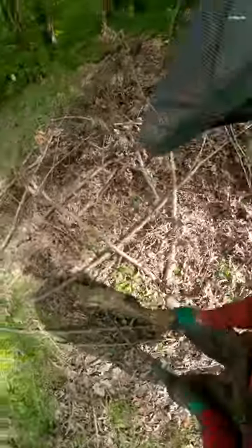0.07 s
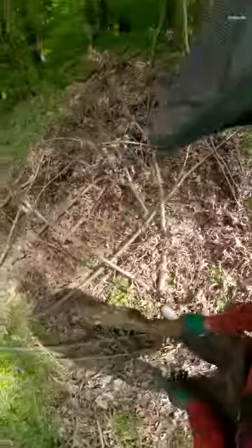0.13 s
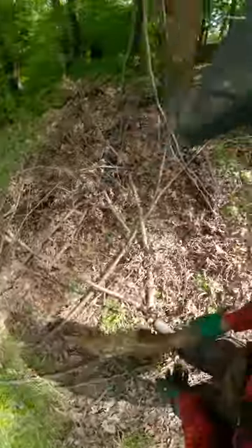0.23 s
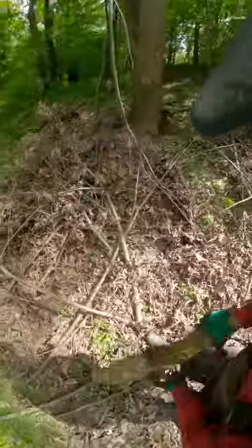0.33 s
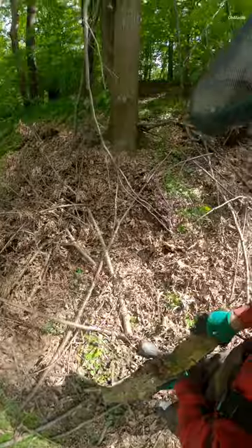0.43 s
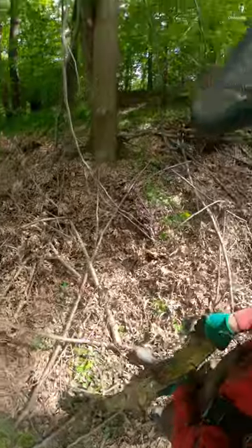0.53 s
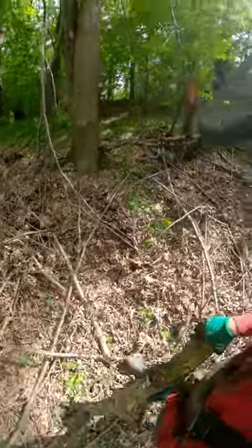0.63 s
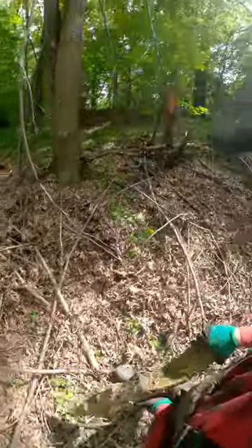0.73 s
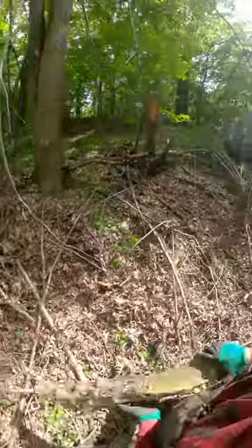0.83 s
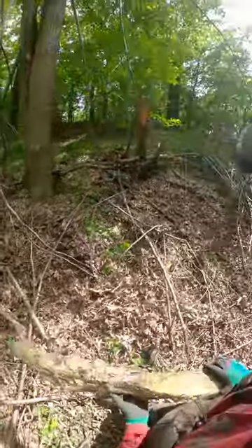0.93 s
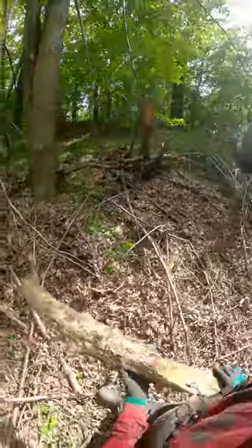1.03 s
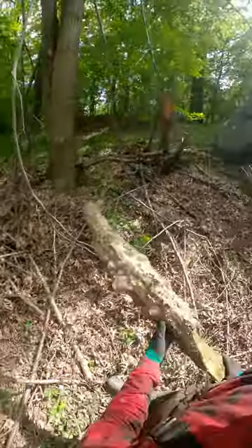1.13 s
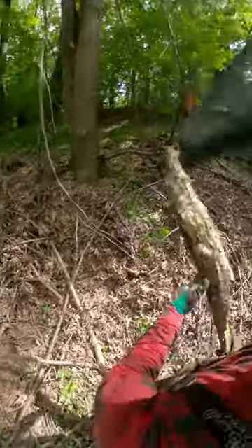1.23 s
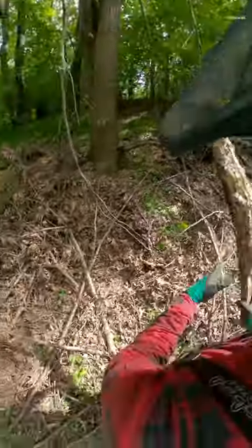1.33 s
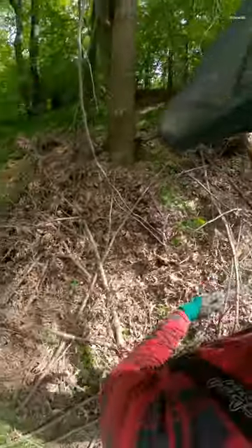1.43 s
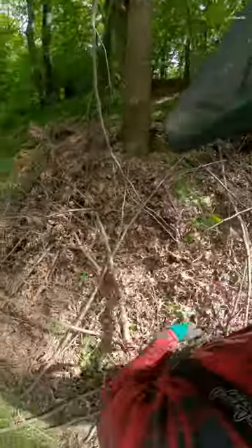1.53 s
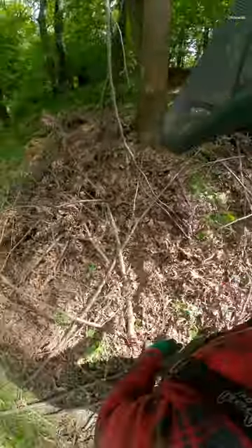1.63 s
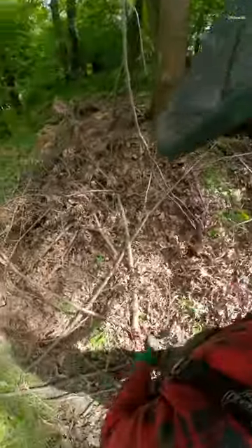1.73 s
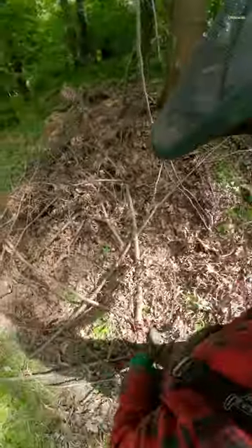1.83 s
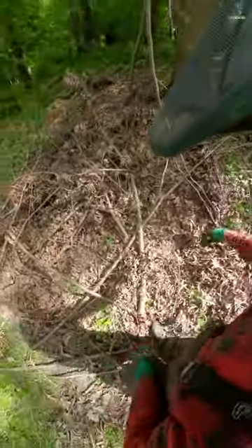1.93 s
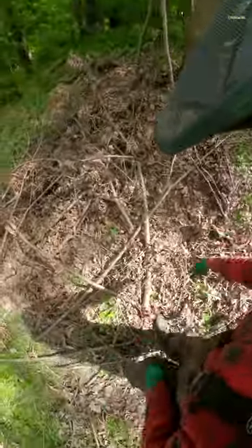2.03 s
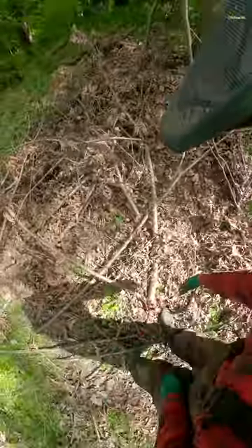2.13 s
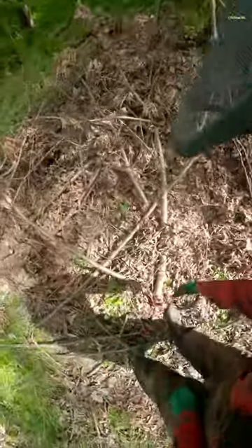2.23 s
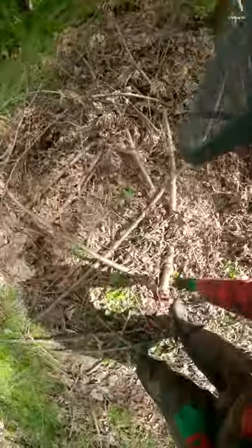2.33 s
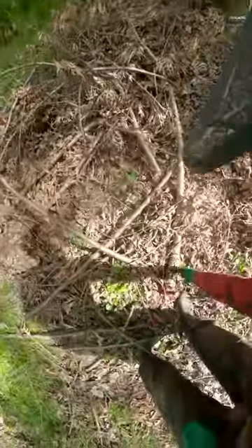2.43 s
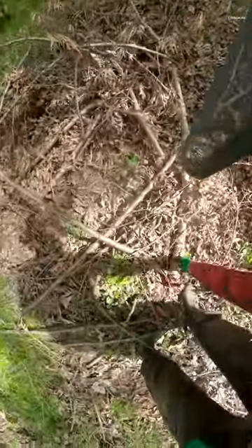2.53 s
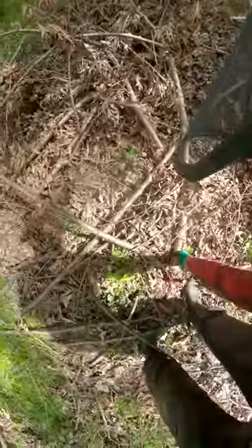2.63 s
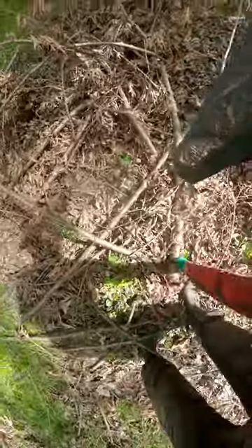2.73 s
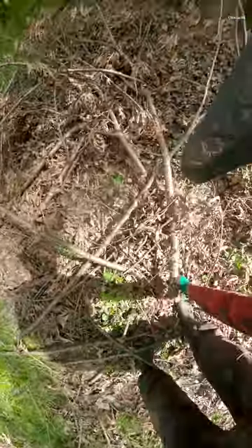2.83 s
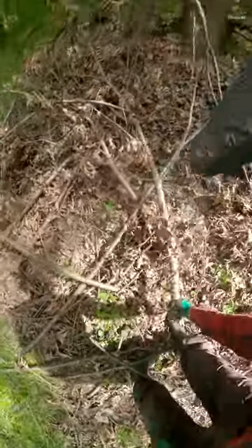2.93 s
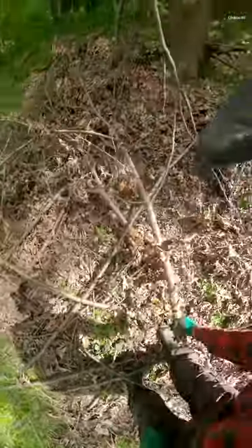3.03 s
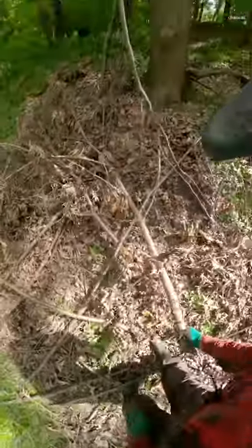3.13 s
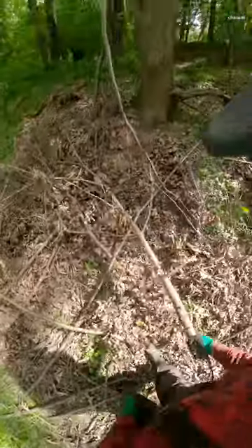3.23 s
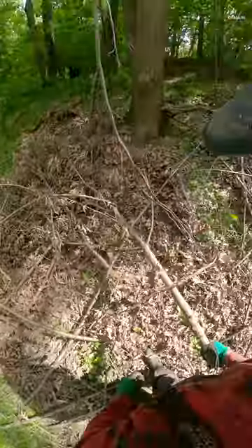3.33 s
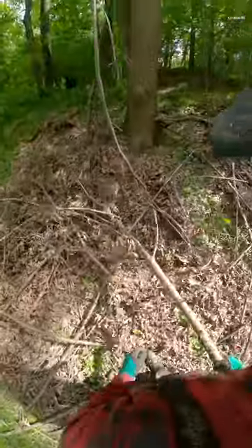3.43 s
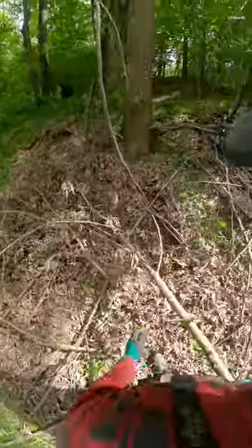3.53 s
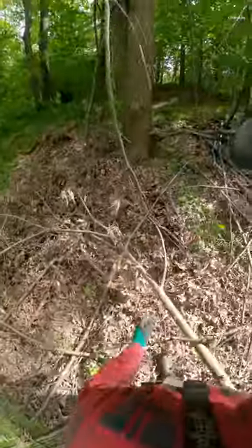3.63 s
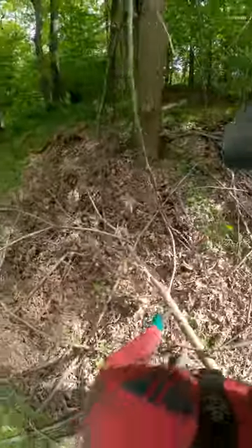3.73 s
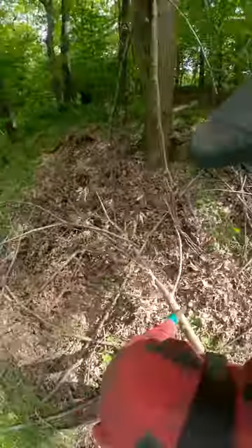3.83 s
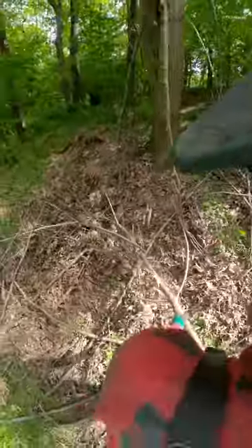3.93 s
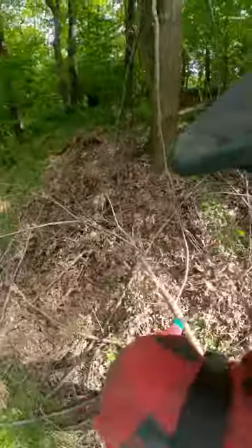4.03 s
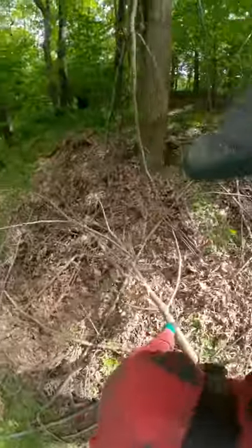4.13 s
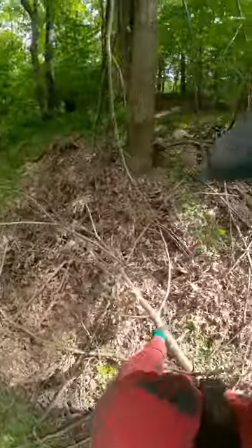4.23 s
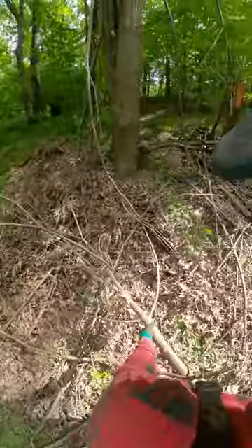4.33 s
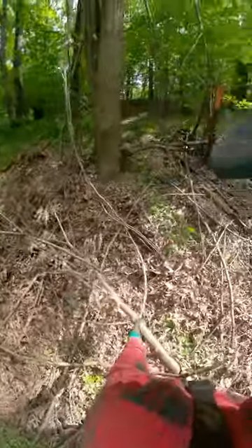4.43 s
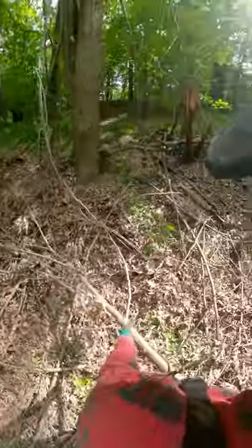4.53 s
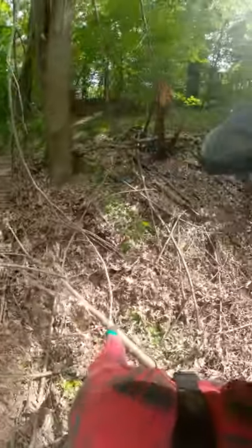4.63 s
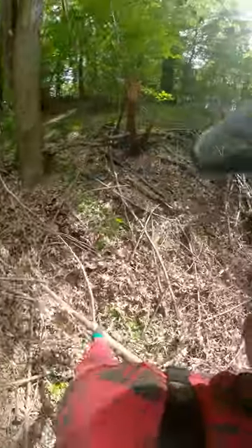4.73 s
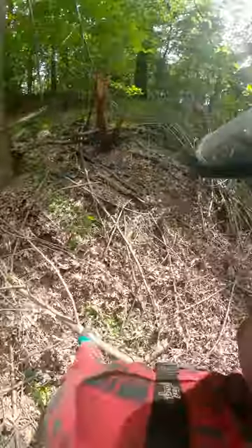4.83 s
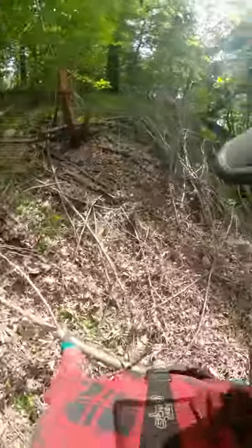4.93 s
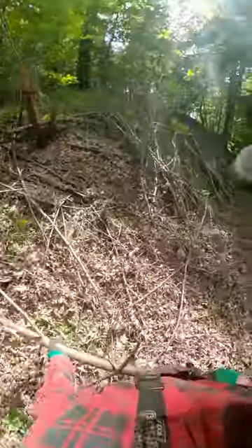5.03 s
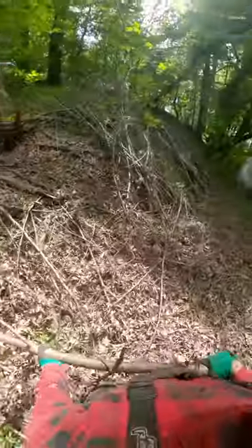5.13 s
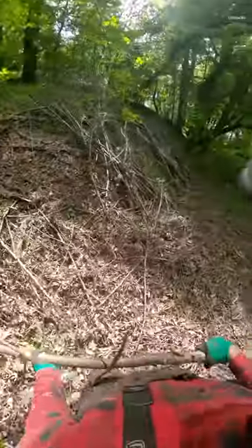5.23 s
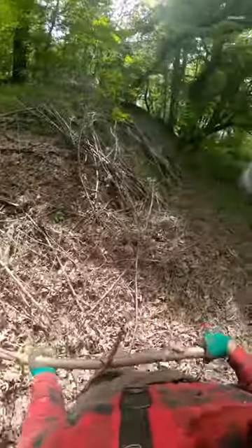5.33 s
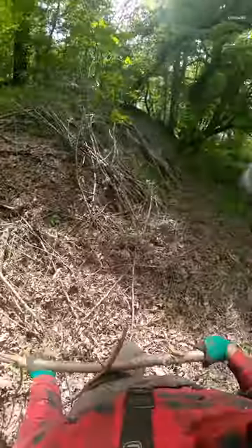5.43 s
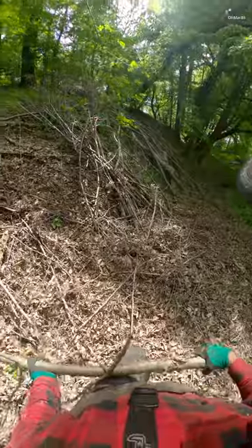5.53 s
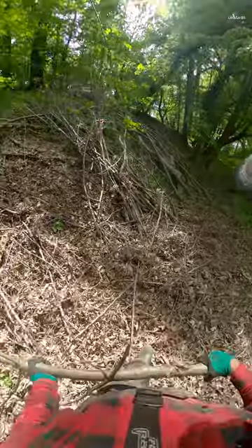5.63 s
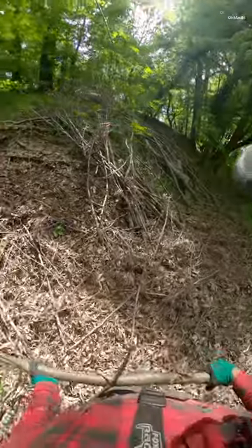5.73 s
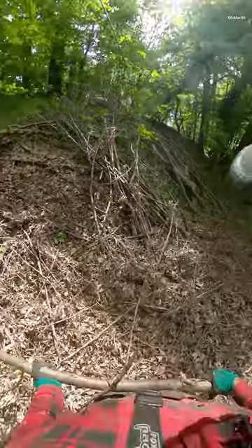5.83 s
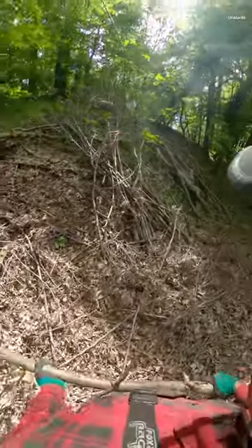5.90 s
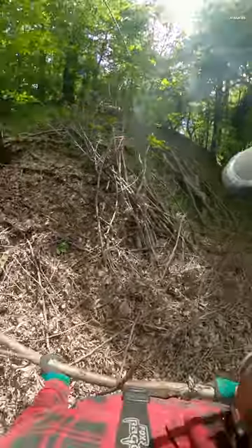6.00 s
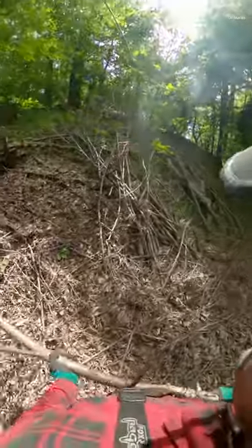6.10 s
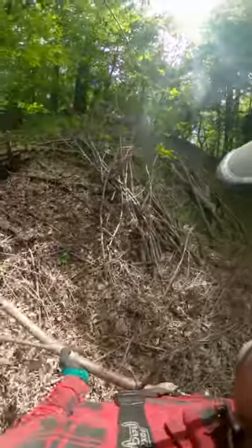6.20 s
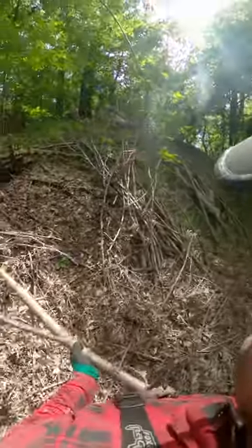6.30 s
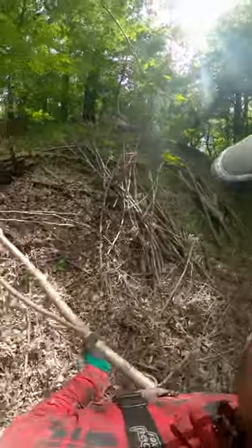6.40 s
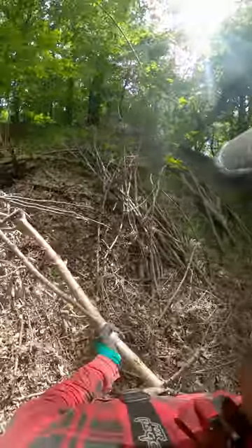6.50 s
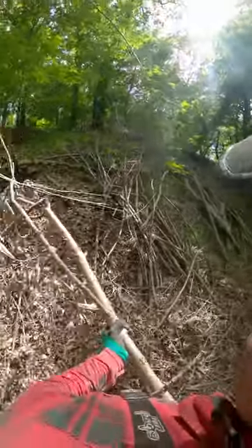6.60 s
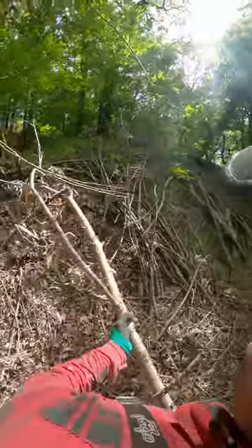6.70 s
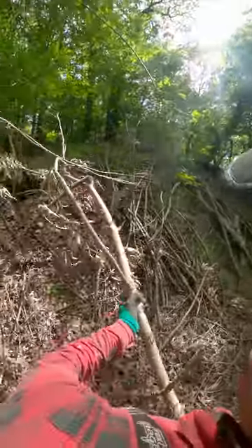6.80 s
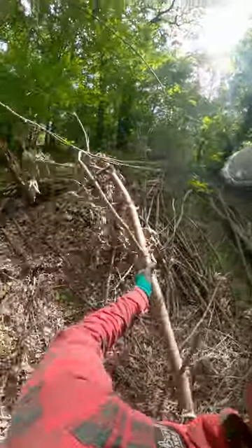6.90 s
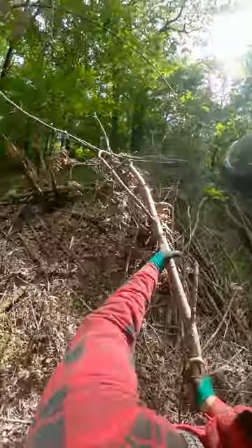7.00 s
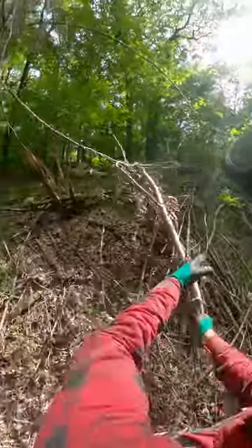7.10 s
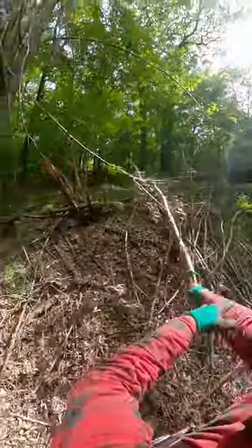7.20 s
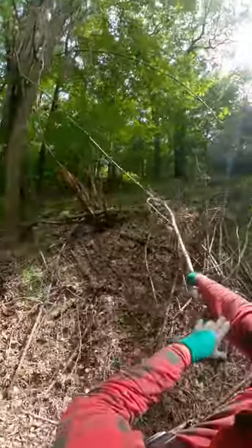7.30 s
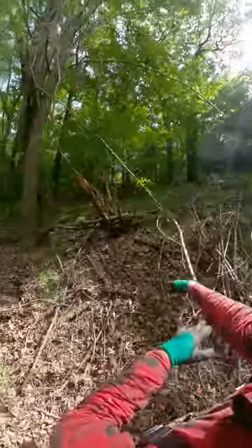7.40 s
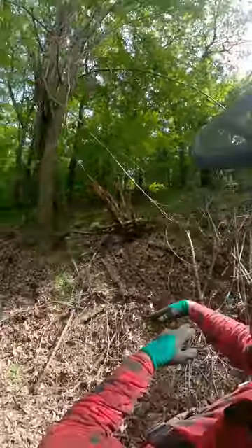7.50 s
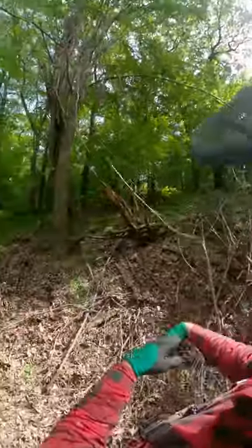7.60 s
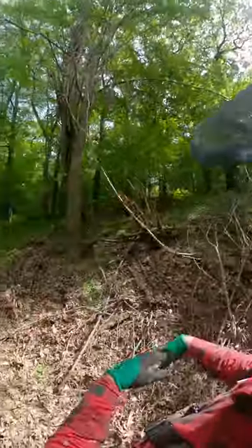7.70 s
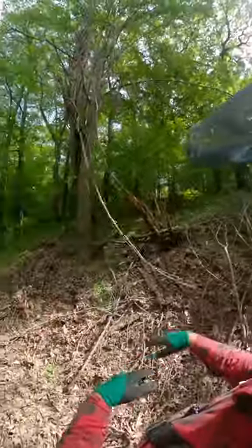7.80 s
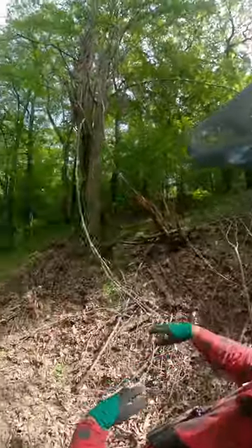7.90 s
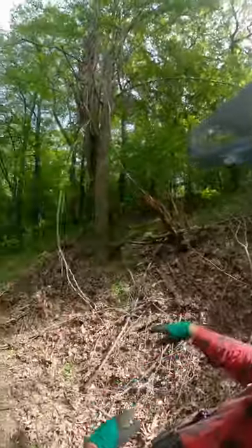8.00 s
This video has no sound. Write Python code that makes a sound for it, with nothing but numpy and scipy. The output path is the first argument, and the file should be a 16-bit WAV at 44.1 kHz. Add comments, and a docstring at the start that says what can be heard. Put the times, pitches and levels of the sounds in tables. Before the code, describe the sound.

Someone hauls wood through crisp leaf litter: rushing rustles, a dull log thud, sharp twig cracks, then a hollow clatter of a thrown branch.

```python
"""Dry leaves crackle at once under sweeping cut branches, while air buffets a body-worn microphone.
The scene is a wooded bank: boots crush the litter, twigs snap, a log thuds down and later a branch clatters in.
Leaves, stems and litter are crowds of tiny random clicks, each filtered to its own tone.
Snaps are short noise bursts, wood knocks are sums of dying tones, and wind and the woods are filtered noise."""
import sys
import numpy as np
from scipy import signal
from scipy.fft import rfft, irfft, next_fast_len
from scipy.io import wavfile

SR = 44100
rng = np.random.default_rng(int(sys.argv[2]) if len(sys.argv) > 2 else 0)


def dump_mix(stems):
    """Bounce the given channels to the path in sys.argv[1] as a 16-bit WAV at rate SR."""
    frames = np.atleast_2d(stems).T  # one column per channel
    limited = np.clip(frames, -1, 1)  # hard clip at full scale
    pcm = np.round(limited * 32767).astype(np.int16)
    wavfile.write(sys.argv[1], SR, pcm)


N = 355225
TIME = np.arange(N) / SR  # seconds

# How widely ground sounds and the woods spread. Each row: pitch in Hz, side minus middle in dB.
WIDTH = [(100, -15), (600, -20.5), (1400, -13.5), (3100, -14), (4500, -9), (7000, -10), (10000, -5.5),
         (14000, -16)]
# Weight on the ground; a raised branch only brushes the leaf tops, sparing stems and litter.
# Each row: time in seconds, change in level in dB.
WEIGHT = [(0, 2.5), (1.3, -0.5), (2.4, 5), (2.8, -2.5), (3.1, 2.5), (3.8, -2), (4.1, -3.5), (4.7, -5),
          (5.2, 1), (6.8, -0.5), (7.4, 2.5), (7.85, 3), (7.92, -3.5)]
# The tones of a thin branch. Each row: pitch in Hz, level in dB, time to fall by 60 dB in seconds.
BRANCH = [(1100, -4, 0.012), (1280, 7.5, 0.0097), (1520, 5.5, 0.011), (1695, 4, 0.014), (2020, -2, 0.013),
          (2090, 2.5, 0.021), (2510, 9.5, 0.0086), (3020, 2, 0.013), (3570, 7, 0.02)]


def from_db(db):
    """Turn decibels into a gain."""
    return 10 ** (np.asarray(db) / 20)


def rms_one(x):
    """Scale a sound to an average power of one."""
    return x / np.sqrt(np.mean(x ** 2) + 1e-20)


def in_time(rows):
    """Draw straight lines between (seconds, value) rows to get a value at every sample."""
    return np.interp(TIME, *np.transpose(rows))


def at_hz(points, hz):
    """Read a (Hz, value) curve on a log-frequency axis, as the ear spaces pitch."""
    curve_hz, values = np.transpose(points)
    return np.interp(np.log(np.maximum(hz, 1)), np.log(curve_hz), values)


def drift(rate_hz):
    """Slow random wandering with spread 1, made at every 20th sample and joined by lines."""
    step, warm_up = 20, 2000
    pole = np.exp(-2 * np.pi * rate_hz * step / SR)
    noise = rng.standard_normal(N // step + warm_up + 2)
    slow = signal.lfilter([1], [1, -2 * pole, pole * pole], noise)[warm_up:]
    return np.interp(np.arange(N) / step, np.arange(len(slow)), rms_one(slow))


def coloured(x, spectrum, size=8192):
    """Filter to a spectrum with no sound ahead of its cause (minimum phase)."""
    wanted_gain = from_db(at_hz(spectrum, np.fft.rfftfreq(size, 1 / SR)))
    cepstrum = irfft(np.log(wanted_gain))
    # folding the second half onto the first puts the filter's energy as early as possible
    cepstrum[1:size // 2] *= 2
    cepstrum[size // 2 + 1:] = 0
    response = irfft(np.exp(rfft(cepstrum)))
    return signal.oaconvolve(x, response[None], axes=-1)[:, :N]


def add(out, s, sound):
    """Mix a sound in from time s in seconds."""
    start = int(s * SR)
    out[:, start:start + sound.shape[-1]] += sound[..., :N - start]


def left_right(pan_db):
    """Gains that set left minus right to pan_db."""
    return from_db(np.array([[pan_db], [-pan_db]]) / 2)


def in_stereo(mid_side, width):
    """Left and right share the middle sound and differ by a side sound of the given width."""
    side = coloured(mid_side[1:], width)
    return mid_side[:1] + side * [[1], [-1]]


def fractures(per_s, spread_db):
    """Random clicks of uneven size as (middle, side), their power kept steady as the rate changes."""
    chance = np.clip(per_s / SR * np.ones(N), 1e-5, 1)
    at = np.flatnonzero(rng.random(N) < chance)
    size_db = spread_db * np.minimum(rng.exponential(1, len(at)), 4)
    size = from_db(size_db) / np.sqrt(chance[at])  # crowded clicks are each smaller
    clicks = np.zeros((2, N))
    # independent signs in middle and side send clicks to different sides
    clicks[:, at] = size * np.sign(rng.random((2, len(at))) - .5)
    return rms_one(clicks)


def crackle(per_s, spread_db, clump_db, patchy_db, edges_hz):
    """Fractures ring briefly, per_s in each band, and clump together as leaves catch and let go."""
    out = 0
    for low, high in zip(edges_hz, edges_hz[1:]):
        band = signal.butter(2, [low, high], "band", fs=SR, output="sos")
        ringing = signal.sosfilt(band, fractures(per_s, spread_db) + 1e-18)
        out = out + ringing * from_db(patchy_db * drift(21))
    return out * from_db(clump_db * drift(56))


def pull():
    """How hard wood is drawn over the ground, in dB above a firm pull."""
    # The log is pulled clear of the leaves and lifted. Each row: time in seconds, pull in dB.
    lift = [(0.0, -28.5), (0.248, -25.5), (0.662, -43.5), (0.7, -37.5), (1.526, -61.5), (1.564, -46),
            (1.758, -54.5), (1.824, -49), (1.95, -62)]
    # The branch is picked up, dragged along and thrown on the pile. Each row: time in seconds, pull in dB.
    drag = [(2.22, -47), (2.33, -40), (2.53, -44.5), (3.08, -22.5), (3.81, -22.5), (4.04, -32.5),
            (4.27, -33), (4.33, -32), (4.35, -29.5), (4.49, -28.5), (4.56, -34), (4.95, -24), (5.56, -34.5),
            (5.66, -28.5), (6.65, -28.5), (6.7, -24), (7.11, -26.5), (7.19, -32.5), (7.66, -25.5),
            (8.05, -43.5)]
    firm_pull_db = -26.5
    return in_time(np.vstack([lift, drag])) - firm_pull_db


def swell(s, rise_s, fall_s):
    """Pressure builds up to time s and then dies away."""
    before = np.minimum(TIME - s, 0)
    after = np.maximum(TIME - s, 0)
    return np.exp(-(before / rise_s) ** 2 - after / fall_s)


def with_treads(level_db, axis):
    """Boots and wood press into the ground, raising leaves (axis 0), stems (1) or litter (2)."""
    # Each row: time in seconds, dying time in seconds, then leaves, stems and litter in dB.
    treads = [(0.72, 0.07, -38, -58, -61), (1.61, 0.14, -59, -55, -66), (1.992, 0.078, -38.5, -46, -41.5),
              (2.071, 0.12, -27.5, -31.5, -37), (2.351, 0.036, -35.5, -34.5, -43),
              (2.62, 0.18, -51, -37.5, -52), (3.70, .06, -36, -29.5, -45),
              (3.785, 0.046, -31.5, -39, -37.5), (5.50, 0.059, -49, -43, -40.5),
              (5.675, 0.11, -25, -27, -35), (5.78, .04, -34, -35, -40), (6.02, 0.048, -28, -36, -40),
              (6.14, 0.047, -39, -47, -38), (6.41, 0.21, -31.5, -37, -38.5), (6.649, .02, -38, -39, -30),
              (7.13, 0.015, -34, -28, -35), (7.26, 0.033, -45.5, -42, -43), (7.62, 0.16, -35, -31.5, -38),
              (7.86, 0.014, -53, -36, -55)]
    rise_s = 0.029
    power = from_db(level_db) ** 2
    for s, fall_s, *layer_db in treads:
        power = power + (from_db(layer_db[axis]) * swell(s, rise_s, fall_s)) ** 2
    return 10 * np.log10(power)


def with_swings(level_db, swings):
    """Raise a level in dB by movements that speed up and slow down evenly."""
    power = from_db(level_db) ** 2
    for s, half_s, db in swings:
        power = power + from_db(db) ** 2 * np.exp(-2 * ((TIME - s) / half_s) ** 2)
    return 10 * np.log10(power)


def leaves():
    """A harder sweep breaks more leaves at once, so lone crackles merge into a rush."""
    # The tone of crackling leaves. Each row: pitch in Hz, strength in dB per Hz.
    leaf_tone = [(500, -33.5), (1200, -10), (2200, -4), (3000, -2), (4000, 0.5), (5200, -1.5), (6700, 0.5),
                 (7300, -3), (8100, -12), (9600, -15.5), (10600, -24.5), (11800, -30.5), (14500, -33.5),
                 (16000, -53)]
    # Twigs catch and spring free. Each row: time in seconds, half length in seconds, rustle in dB.
    swishes = [(1.063, 0.057, -43.5), (1.29, .03, -51.5), (1.396, .02, -50.5), (2.922, .04, -29),
               (4.43, 0.05, -33), (4.725, 0.045, -30), (5.37, 0.052, -30), (5.982, .03, -26),
               (6.277, 0.017, -29), (6.783, 0.016, -21), (6.889, 0.018, -24.5), (7.013, 0.026, -30)]
    firm_db, firm_per_s, crowding, spread_db = -26, 3600, .7, 2.3
    level_db = with_swings(with_treads(firm_db + pull(), axis=0), swishes)
    rate = firm_per_s * from_db(crowding * (level_db - firm_db))
    edges_hz = np.geomspace(700, 17000, 10)
    small = rms_one(crackle(rate, spread_db, clump_db=0.64, patchy_db=1.28, edges_hz=edges_hz))
    # brittle stalks break across all bands at once
    crisp = from_db(-12) * fractures(rate * 0.16, spread_db)
    return from_db(level_db) * rms_one(coloured(small + crisp, leaf_tone))


def stems():
    """Thin stems stick and slip on each other with hollow ticks."""
    # The tone of the ticks. Each row: pitch in Hz, strength in dB per Hz.
    stem_tone = [(400, -12.5), (900, -9), (1180, -2), (1700, -3.5), (2400, -5.5), (3500, -13),
                 (7000, -22.5), (12000, -66)]
    firm_db, gain_db = -35.5, -3  # level at a firm pull, ahead of weight and gain
    follows, bears = 0.66, .5  # shares of the pull's swing and of the weight that stems take up
    ticks = crackle(700, spread_db=0.0, clump_db=2.0, patchy_db=1.6, edges_hz=np.geomspace(600, 6000, 8))
    level_db = with_treads(firm_db + follows * pull() + bears * in_time(WEIGHT), axis=1)
    return from_db(level_db + gain_db) * rms_one(coloured(ticks, stem_tone))


def litter():
    """The packed layer under the leaves gives way with a dull crunch."""
    # The tone of the crunch. Each row: pitch in Hz, strength in dB per Hz.
    litter_tone = [(60, -27.5), (150, -1), (280, 0), (600, 0.5), (900, -1.5), (1400, -8.5), (3000, -38),
                   (9000, -56)]
    firm_db, gain_db = -44.5, 2.0  # level at a firm pull, ahead of weight and gain
    follows = 0.53  # share of the pull's swing
    crunch = crackle(550, spread_db=1.5, clump_db=0.5, patchy_db=2.4, edges_hz=np.geomspace(90, 2400, 6))
    level_db = with_treads(firm_db + follows * pull() + in_time(WEIGHT), axis=2)
    return from_db(level_db + gain_db) * rms_one(coloured(crunch, litter_tone))


def turned(x):
    """As the wearer turns, the microphone's body shades treble from the far side."""
    # Bearing of the rustle. Each row: time in seconds, left minus right in dB in the treble.
    bearing = [(0.0, 0.5), (1.03, 6.5), (1.75, 6), (1.97, 2.5), (2.17, 2.5), (2.38, 0), (2.85, -0.5),
               (3.2, 1), (4.35, 1.5), (4.64, 0.5), (5.36, 3.5), (6.28, 4.5), (7.2, 2), (7.67, 4.0),
               (8.05, 4)]
    # Long waves bend round the body. Each row: pitch in Hz, share of the level difference from 0 to 1.
    shadow = [(700, 0), (1300, 1), (3200, 1), (4600, 1), (8000, 0.6), (13000, 0.5)]
    size = next_fast_len(N)
    share = np.clip(at_hz(shadow, np.fft.rfftfreq(size, 1 / SR)), 0, 1)
    treble = irfft(rfft(x, size) * share, size)[:, :N]
    side_gain = from_db(in_time(bearing) * [[.5], [-.5]])
    return x + treble * (side_gain - 1)


def rustle():
    """Leaves, stems and litter sound from the ground on the left or from the pile ahead."""
    # Where the rustle comes from. Each row: time in seconds, share from the pile ahead from 0 to 1.
    ahead_share = [(0, 0.31), (1.9, 0.1), (2.0, 0.7), (2.6, 0.75), (2.9, 0.32), (3.8, 0.33), (4.3, 0.25),
                   (7.1, 0), (7.25, 0.14), (7.45, 0.84), (8.05, 0.94)]
    # The microphone's body colours each direction differently. Each row: pitch in Hz, level in dB.
    from_left = [(3500, -1), (4080, 2), (4450, -7.5), (4850, -3.5), (5500, 0), (8000, 0.5), (9500, -0.5)]
    from_ahead = [(3400, 1), (3850, -5), (4200, -6), (4600, 2.5), (5250, 0), (5750, -3), (6250, -1),
                  (7100, 1.5), (7500, 2.5), (8200, 8), (10000, 6)]
    ground = in_stereo(leaves() + stems() + litter(), WIDTH)
    ahead = np.clip(in_time(ahead_share), 0, 1)
    return turned((1 - ahead) * coloured(ground, from_left) + ahead * coloured(ground, from_ahead))


def wind():
    """Eddies burst on the two microphone ports; slow air sheds only the large, deep ones."""
    # Light air between gusts. Each row: time in seconds, buffet in dB ahead of the gain.
    breeze = [(0, -53), (4.9, -44.5), (6.2, -57.5), (8.05, -46.5)]
    # Each swing of the body pushes air over the ports.
    # Each row: time in seconds, half length in seconds, buffet in dB ahead of the gain.
    gusts = [(0.02, 0.057, -26.5), (0.18, 0.06, -36), (0.603, .03, -38), (1.14, 0.14, -29),
             (1.442, 0.079, -39), (1.566, 0.035, -30.5), (1.773, 0.027, -40), (2.107, 0.098, -38.5),
             (3.04, 0.07, -27.5), (3.253, 0.053, -34.5), (3.492, 0.033, -37), (3.792, .03, -19.5),
             (3.859, 0.044, -25), (4.02, 0.055, -33), (4.148, 0.049, -24), (4.38, 0.13, -42),
             (4.64, 0.19, -29), (4.85, 0.038, -30.5), (4.976, .03, -32.5), (5.106, .02, -34),
             (7.05, 0.024, -30), (7.167, 0.12, -28.5), (7.845, 0.039, -33)]
    # The tone of a gust. Each row: pitch in Hz, strength in dB per Hz.
    gust_tone = [(12, -19), (25, 0.5), (55, 3.5), (100, -1.5), (160, -10), (260, -18.5), (400, -35),
                 (1000, -46), (5000, -115)]
    # Small eddies strike each port alone. Each row: pitch in Hz, side minus middle in dB.
    wind_width = [(30, -3), (60, -2), (130, -1.5), (300, -3)]
    even_mix_db, lumpy_db, gain_db = -34, 2, -1.5  # gust and lull mix evenly at the first level
    level_db = with_swings(in_time(breeze), gusts)
    lumpy_noise = rng.standard_normal((2, N)) * from_db(lumpy_db * drift(19))
    gust = rms_one(coloured(lumpy_noise, gust_tone))
    lull = rms_one(signal.lfilter(*signal.butter(1, 70, fs=SR), gust))
    lull[1] *= from_db(-4)  # large eddies reach both ports nearly alike
    force = 1 / (1 + from_db(even_mix_db - level_db))
    return from_db(level_db + gain_db) * in_stereo(force * gust + (1 - force) * lull, wind_width)


def woods_hush():
    """The woods around give a steady, faint hush of filtered noise."""
    # The tone of the hush. Each row: pitch in Hz, strength in dB per Hz.
    woods_tone = [(30, 14), (100, -2), (300, 6), (800, -12), (1200, 1.5), (2000, -11.5), (7000, -5),
                  (11000, -25), (16000, -57)]
    noise = coloured(rng.standard_normal((2, N)), woods_tone)
    return from_db(-52) * rms_one(in_stereo(noise, WIDTH))


def struck(blows, modes, reach_octaves, contact_s, grit, detune, uneven_db):
    """Each blow rings the wood's tones near the pitch it favours; rough bark makes the contact chatter."""
    out, t = np.zeros((2, N)), TIME[:SR // 5]
    hz, mode_db, t60 = np.transpose(modes)[:, :, None]
    signs = (-1) ** np.arange(len(hz))[:, None]  # neighbouring tones start in opposite directions
    for s, peak_db, favoured_hz in blows:
        favour = np.exp(-(np.log2(hz / favoured_hz) / reach_octaves) ** 2)
        strength = signs * favour * from_db(mode_db + uneven_db * rng.standard_normal(hz.shape))
        pitch = hz * (1 + detune * rng.standard_normal(hz.shape))  # the wood is held differently at each touch
        ring = np.sum(strength * np.sin(2 * np.pi * pitch * t) * from_db(-60 * t / t60), axis=0)
        contact = grit * rng.standard_normal(len(t)) * np.exp(-t / contact_s)
        contact[0] += 1  # the first hard touch
        knock = signal.fftconvolve(ring, contact)[:len(t)]
        add(out, s, from_db(peak_db) * knock / np.abs(knock).max())
    return out


def logs():
    """Heavy wood lands, bounces and settles on soft ground, and boots meet it too, in dull dying tones."""
    # Heavy wood and boots meeting the ground.
    # Each row: start in seconds, peak in dB ahead of the gain, pitch in Hz that the contact favours.
    thuds = [(.072, -25.5, 510), (1.610, -32, 440), (1.968, -9.5, 500), (1.982, -17, 420),
             (2.032, -11.5, 563), (2.035, -13.5, 178), (2.052, -17, 192), (2.064, -9, 320),
             (2.072, -18.5, 650), (2.090, -15.5, 300), (2.365, -25, 710), (2.385, -23.5, 596),
             (2.580, -23, 950), (2.608, -22.5, 900), (2.632, -24, 950), (5.499, -20.5, 387),
             (6.033, -20.5, 496), (6.10, -27, 286), (6.165, -25, 400), (6.628, -28, 313), (6.643, -21, 410),
             (7.68, -22, 475)]
    # The tones of a log on soft ground.
    # Each row: pitch in Hz, level in dB, time to fall by 60 dB in seconds.
    log_tones = [(152, -10, 0.28), (231, 3.5, 0.041), (296.5, -0.5, 0.11), (394, -1.5, 0.054),
                 (491, -5.5, 0.063), (551, -5, 0.1), (650, -2.5, 0.041), (803, -8, 0.023), (960, -17, 0.02)]
    knocks = struck(thuds, log_tones, reach_octaves=0.49, contact_s=0.00086, grit=0.041,
                    detune=0.023, uneven_db=3.5)
    return from_db(-6.0) * knocks


def snaps():
    """A twig breaks in a quickly dying burst of fibre cracks around its own pitch."""
    # Each row: start in seconds, peak in dB ahead of gain and panning, centre pitch in Hz,
    # time for the burst to fall by 60 dB in seconds, left minus right in dB.
    snap_rows = [(.338, -24.5, 1300, 0.055, 7), (0.415, -25, 6000, 0.023, 4), (0.53, -24.5, 1070, .03, 2),
                 (0.629, -28, 4000, 0.023, 6), (.858, -33, 1100, .015, -2), (1.363, -30, 4700, 0.014, 9),
                 (1.608, -31, 1150, 0.025, 2), (1.853, -20.5, 4970, 0.0045, 8),
                 (1.969, -25, 2070, 0.074, 2.5), (2.029, -22.5, 1720, .1, 2), (2.201, -21, 3530, 0.0064, 8),
                 (2.706, -19.5, 5400, 0.023, 7), (2.763, -34, 5000, .015, 8), (3.574, -7, 3380, 0.0091, 0),
                 (3.794, -14.5, 4060, 0.016, -1), (4.318, -14.5, 4300, 0.042, 2),
                 (4.327, -15, 4470, 0.028, 7), (4.385, -19, 5900, 0.018, 2), (4.705, -14, 5270, .01, .5),
                 (5.443, -27, 7000, .007, 3), (5.643, -16, 3000, 0.013, 7), (5.826, -20, 1370, 0.11, 4),
                 (6.602, -17, 5980, 0.0091, 19.5), (6.628, -11, 1700, 0.0082, 6),
                 (6.676, -20, 4500, .012, 1), (6.960, -18, 3300, 0.008, 0), (7.123, -10.5, 2280, 0.021, -1),
                 (7.303, -16.5, 3000, .018, 3), (7.676, -18, 4600, 0.0063, 14)]
    sharpness, top_hz, gain_db = 1.43, 8800, 1.5
    out, t = np.zeros((2, N)), TIME[:SR // 8]
    dull = signal.butter(4, top_hz, fs=SR, output="sos")
    for s, peak_db, hz, t60, pan_db in snap_rows:
        burst = rng.standard_normal(len(t)) * from_db(-60 * t / t60)
        pitched = signal.lfilter(*signal.iirpeak(hz, sharpness, fs=SR), burst)
        crack = signal.sosfilt(dull, pitched)
        add(out, s, crack / np.abs(crack).max() * from_db(peak_db + gain_db) * left_right(pan_db))
    return out


def branches():
    """Dry branches clatter together with short, hollow knocks, and one skids into the pile."""
    # Branches knocking together.
    # Each row: start in seconds, peak in dB ahead of gain and panning, pitch in Hz that the contact favours.
    clack_rows = [(1.363, -35, 1500), (1.853, -29.5, 1350), (4.326, -23, 3500), (5.366, -15, 2140),
                  (5.378, -28, 2260), (6.009, -15, 2740), (6.372, -20, 2200), (6.402, -20, 1800),
                  (6.960, -16, 3440), (7.079, -15.5, 2220), (7.126, -14.5, 2180), (7.314, -13, 1560),
                  (7.336, -18, 1810), (7.343, -10, 1830), (7.366, -19, 1420), (7.386, -17, 1600),
                  (7.400, -14.5, 1540), (7.415, -17, 1500), (7.444, -21.5, 1400), (7.862, -24, 1810)]
    clacks = struck(clack_rows, BRANCH, reach_octaves=0.55, contact_s=0.005, grit=.15,
                    detune=0.029, uneven_db=4)
    return (clacks + skid()) * from_db(1) * left_right(2.7)


def skid():
    """Bark of the thrown branch slips over bark in a dense rasp that rings the branch."""
    level_db, slips_per_s, top_hz = -29, 400, 1900  # level ahead of the branches' gain and the swell
    t = TIME[:SR // 20]
    ring = 0
    for k, (hz, db, t60) in enumerate(BRANCH):
        ring = ring + (-1) ** k * from_db(db - 60 * t / t60) * np.sin(2 * np.pi * hz * t)
    clicks = fractures(slips_per_s, spread_db=-2.0)[0] + 1e-18
    slips = signal.lfilter(*signal.butter(4, top_hz, fs=SR), clicks)
    rasp = rms_one(signal.oaconvolve(slips, ring)[:N])
    return from_db(level_db) * swell(7.385, rise_s=.055, fall_s=0.08) * rasp


def scene():
    """Rustle on the ground, wind, the hush of the woods and wood events sound together."""
    wood = logs() + snaps() + branches()
    return rustle() + wind() + woods_hush() + wood


def record(dry):
    """The treble is cut steeply above 15400 Hz."""
    steep_cut = signal.ellip(10, .1, 80, 15400, fs=SR, output="sos")
    return signal.sosfilt(steep_cut, dry)


dry = scene()
out = record(dry)
dump_mix(out)
```